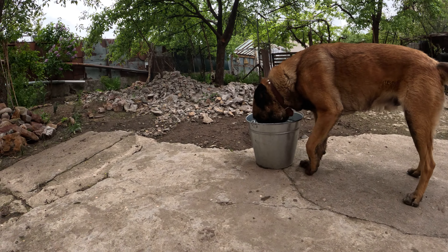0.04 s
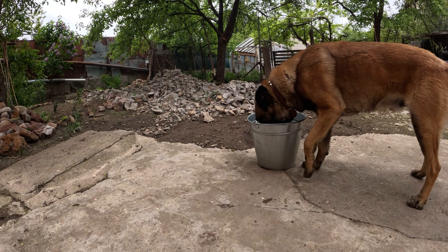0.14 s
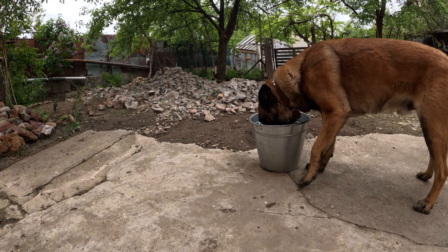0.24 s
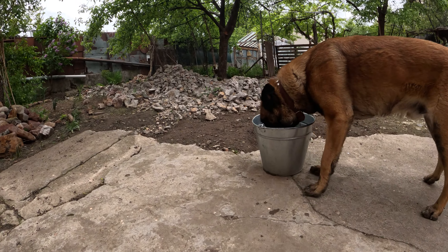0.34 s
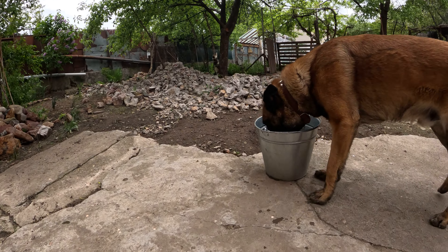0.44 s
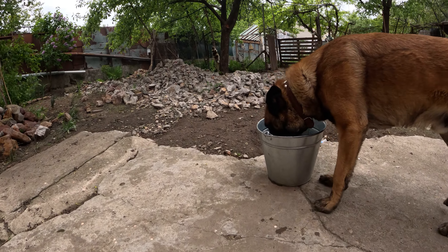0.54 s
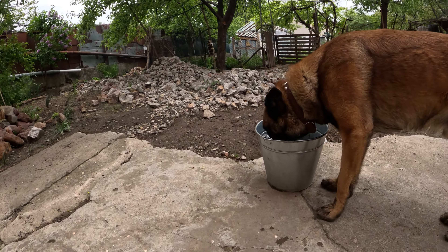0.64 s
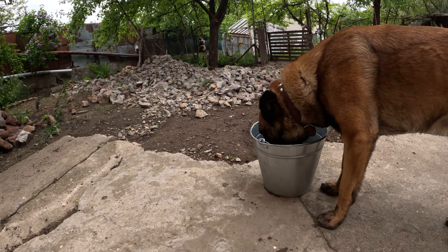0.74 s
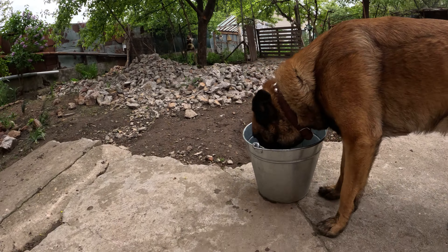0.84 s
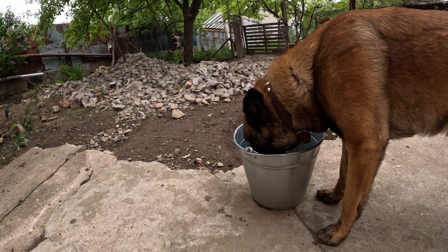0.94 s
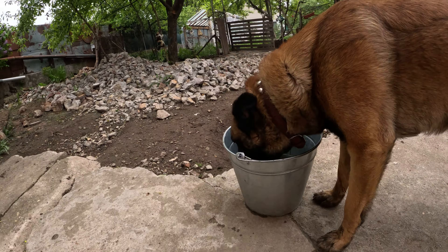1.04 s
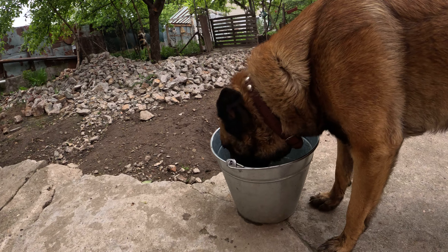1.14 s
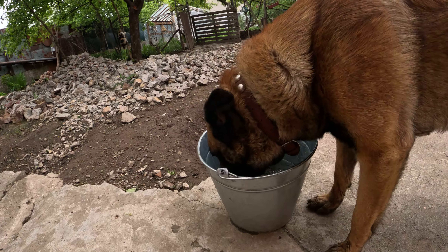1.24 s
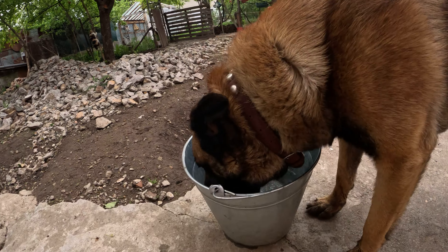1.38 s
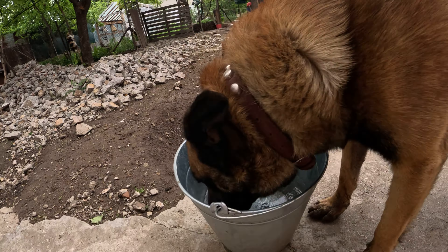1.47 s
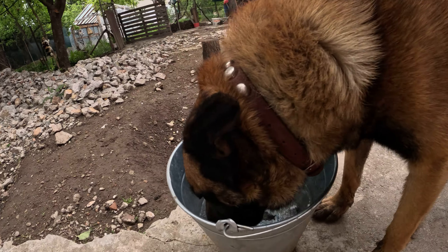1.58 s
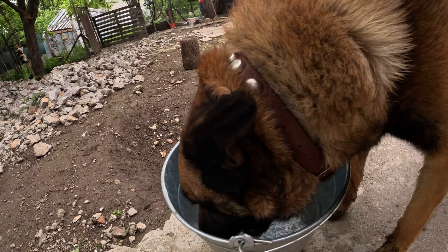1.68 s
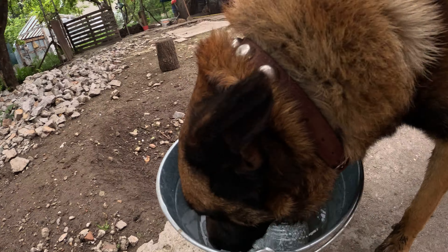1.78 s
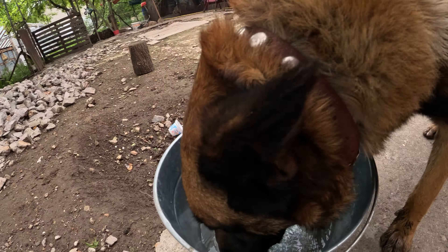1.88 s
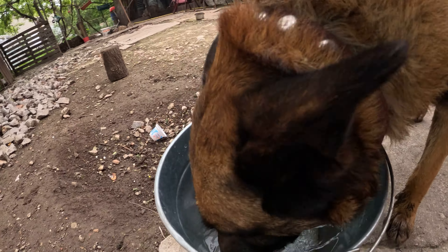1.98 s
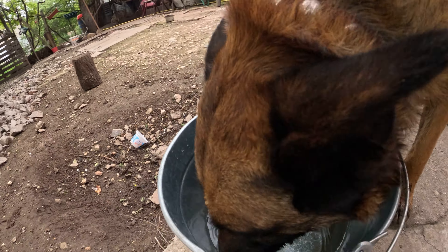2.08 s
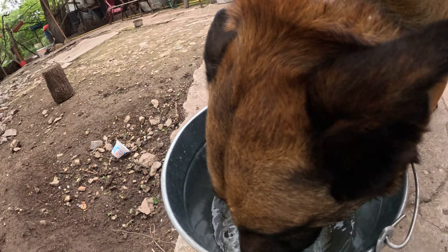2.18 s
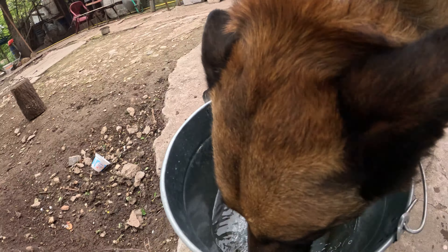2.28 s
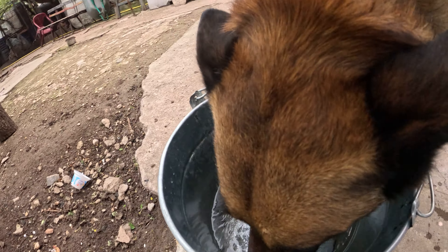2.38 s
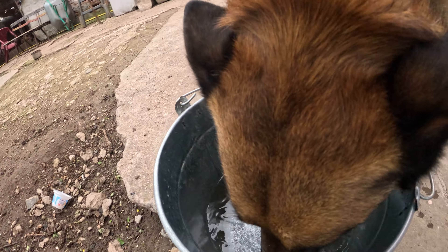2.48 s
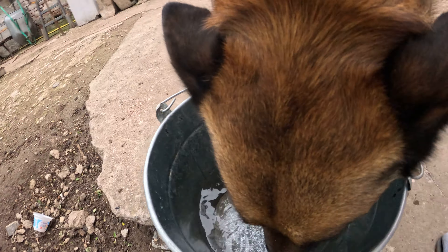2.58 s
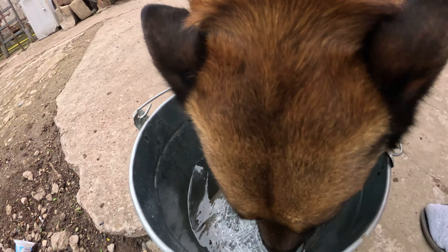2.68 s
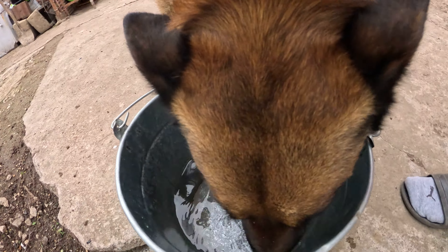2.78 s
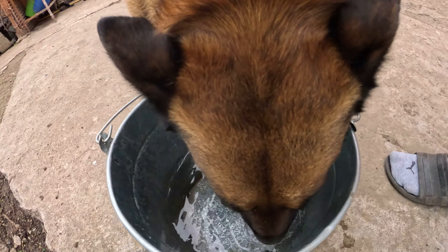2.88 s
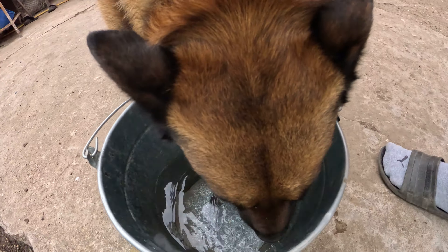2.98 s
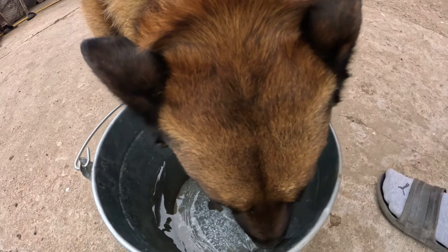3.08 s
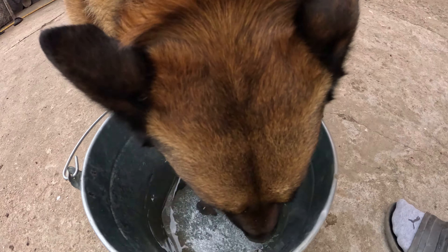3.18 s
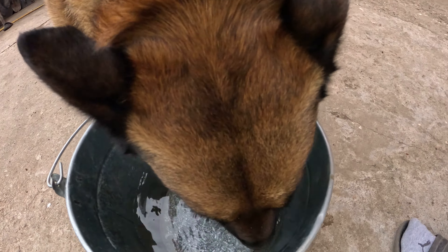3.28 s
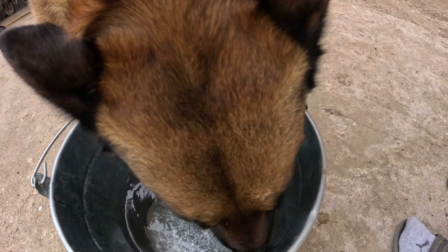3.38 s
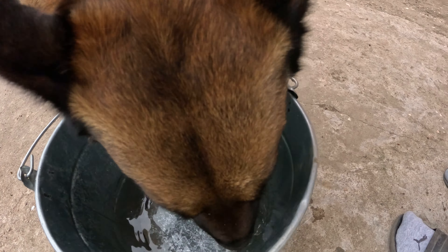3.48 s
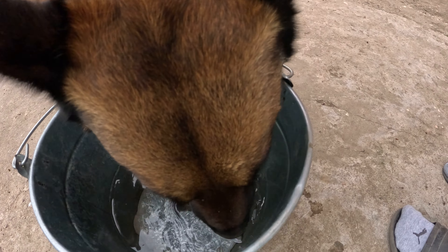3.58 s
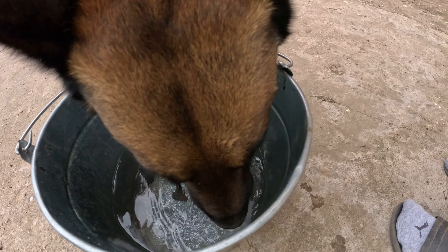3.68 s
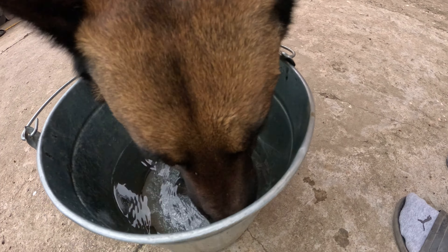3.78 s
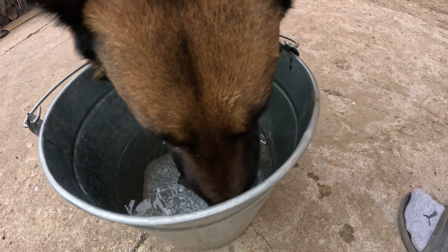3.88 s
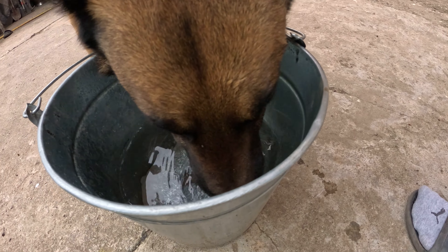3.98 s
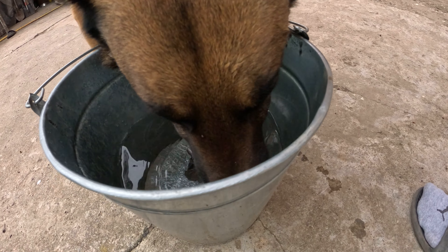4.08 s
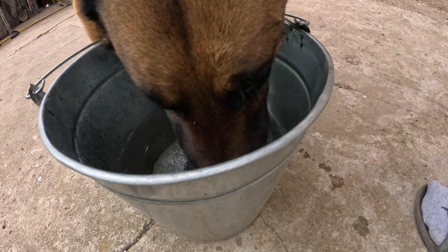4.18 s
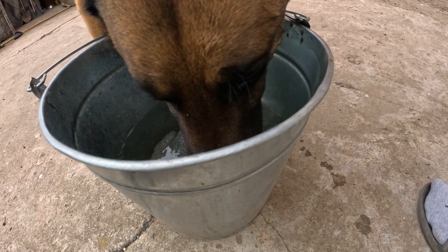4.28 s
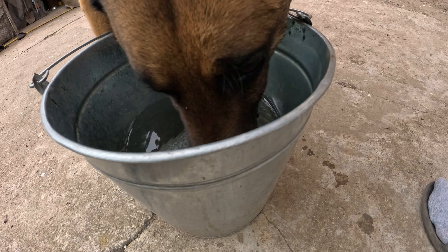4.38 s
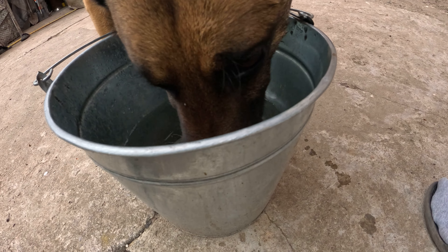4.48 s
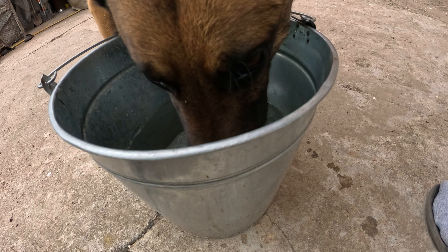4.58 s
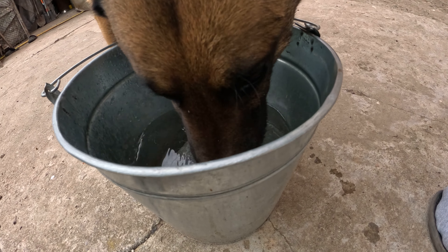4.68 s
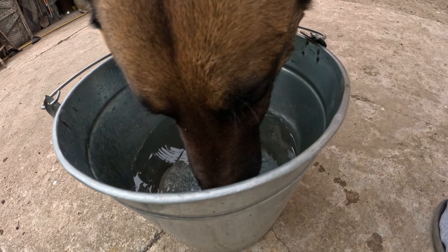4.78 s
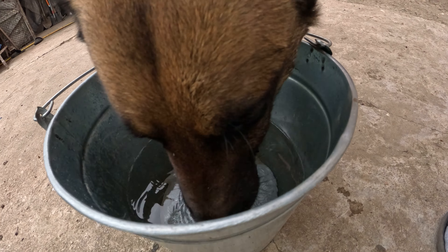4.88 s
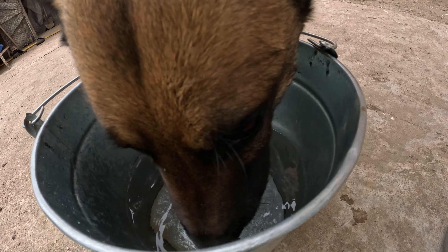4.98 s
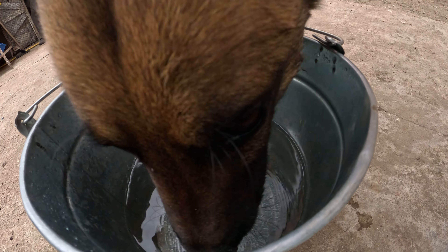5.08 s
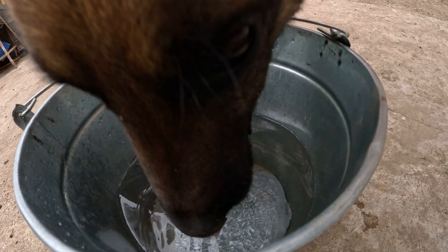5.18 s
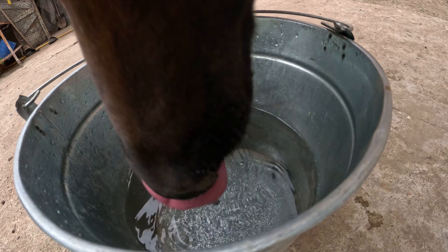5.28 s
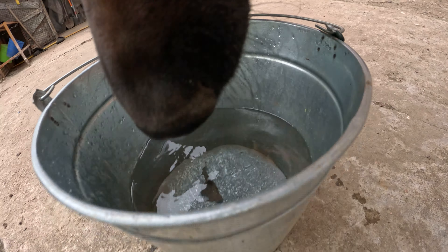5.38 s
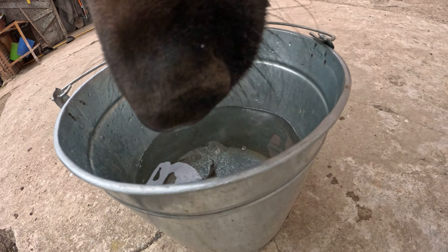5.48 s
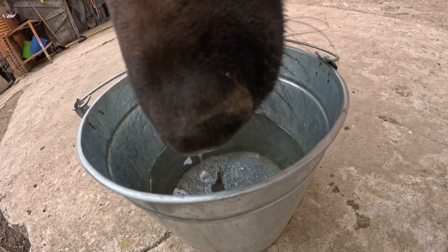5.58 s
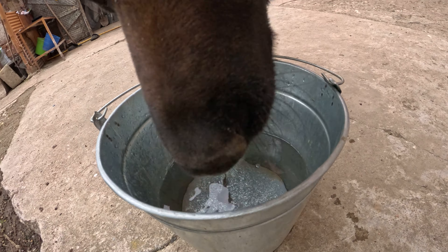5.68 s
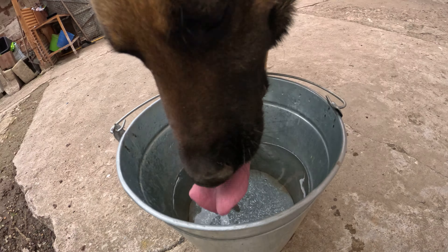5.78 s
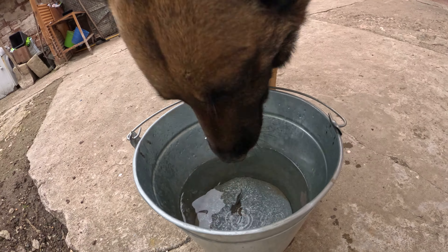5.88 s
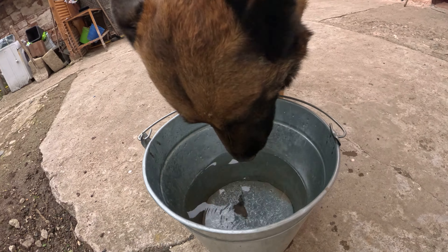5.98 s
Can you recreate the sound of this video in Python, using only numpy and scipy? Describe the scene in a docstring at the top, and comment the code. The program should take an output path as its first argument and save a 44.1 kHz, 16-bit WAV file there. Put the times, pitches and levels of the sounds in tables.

```python
"""A dog laps water from a metal bucket in a yard, nearly three laps a second.
In each lap the tongue smacks the water, air pockets plop and water dribbles back: decaying bubble tones,
droplet clouds and filtered crackle, coloured by the resonances and short reflections of the bucket.
Someone carrying the microphone walks up over gritty concrete (scuffs and cracks of shaped noise),
with soft bumps of damped sines, a low-noise rumble of moving air and faint steady noise of the yard."""
import sys
import numpy as np
from scipy import signal
from scipy.fft import rfft, irfft, next_fast_len
from scipy.io import wavfile

SR = 44100
rng = np.random.default_rng(int(sys.argv[2]) if len(sys.argv) > 2 else 0)


def generate_wav(signal):
    """Clip the signal to [-1, 1] and save it as 16-bit WAV at the path in sys.argv[1]."""
    frames = np.transpose(np.atleast_2d(signal))
    scaled = np.clip(frames, -1, 1) * 32767
    pcm = np.round(scaled).astype(np.int16)
    wavfile.write(sys.argv[1], SR, pcm)


N = 266364
TIME = np.arange(N) / SR
AGE = np.arange(4096) / SR  # time since the start of a short event [s]


def from_db(db):
    """Level: amplitude is ten to the power of dB / 20."""
    return 10 ** (np.asarray(db) / 20)


def rms_one(x):
    """Normalisation: scale to unit root-mean-square amplitude."""
    return x / np.sqrt(np.mean(x ** 2) + 1e-20)


def gain_curve(rows):
    """Envelope: interpolate levels (time [s], level [dB]) and return a gain."""
    times, levels_db = np.transpose(rows)
    return from_db(np.interp(TIME, times, levels_db))


def add(track, start_s, sound):
    """Superposition: mix a sound into the track at its start time."""
    part = track[max(round(start_s * SR), 0):][:len(sound)]
    part += sound[:len(part)]


def band(x, low_hz, high_hz, order=2):
    """Band-pass filtering: keep the energy between two frequencies."""
    sos = signal.butter(order, [low_hz, high_hz], "band", fs=SR, output="sos")
    return signal.sosfilt(sos, x + 1e-18)


def coloured(x, spectrum):
    """Spectral shaping: weight by levels interpolated over log frequency, silent outside them; rms 1."""
    hz, levels_db = np.transpose(spectrum)
    size = next_fast_len(N)
    log_hz = np.log(np.maximum(np.fft.rfftfreq(size, 1 / SR), 1))
    weights_db = np.interp(log_hz, np.log(hz), levels_db, left=-np.inf, right=-np.inf)
    return rms_one(irfft(rfft(x, size) * from_db(weights_db), size)[:N])


def drift(per_s):
    """Slow random modulation: straight lines between random knots; rms 1."""
    knots = rng.standard_normal(4096)
    return rms_one(np.interp(TIME * per_s, np.arange(len(knots)), knots))


def grains(per_s, spread_db, size):
    """Shot noise: clicks at random moments, a few much larger than the rest; rms 1."""
    heights = from_db(spread_db * np.minimum(rng.exponential(1, size), 4))
    heights = heights * rng.choice([-1, 1], size)
    return rms_one(heights * (rng.random(size) < per_s / SR))


def strokes(rows, attack_s, swell_db, release_s):
    """Envelope: each row fades in, moves by swell_db to its level at the end and dies away."""
    out = np.zeros(N)
    for start, length, db in rows:
        end = start + length
        fade_in = np.minimum(TIME - start, 0) / attack_s
        fade_out = np.maximum(TIME - end, 0) / release_s
        remaining = np.clip((end - TIME) / length, 0, 1)
        out += np.exp(fade_in - fade_out) * from_db(db - swell_db * remaining)
    return out


def bubble(hz, t60, glide, swell_s, glide_s=0.0099, size=4096):
    """Bubble oscillation: an air pocket rings with 60 dB decay in t60 [s] and glides [octaves]; envelope peak 1."""
    age = AGE[:size]
    pitch = hz * 2 ** (glide * (1 - np.exp(-age / glide_s)))
    shape = (1 - np.exp(-age / swell_s)) ** 2 * from_db(-60 * age / t60)
    shape = shape / shape.max(axis=-1, keepdims=True)
    return shape * np.sin(2 * np.pi * np.cumsum(pitch, axis=-1) / SR)


def droplets(centre_hz, octaves, spread_s, count):
    """Bubble cloud: pockets of staggered sizes, mostly rising, burst close together; rms 1 over AGE."""
    sizes = (np.arange(count)[:, None] + rng.random((count, 1))) / count
    hz = centre_hz * 2 ** (octaves * (1.8 * sizes - .8))
    rise = .6 * rng.random((count, 1)) - .2
    rings = bubble(hz, t60=.009 * (1500 / hz) ** .45, glide=rise, swell_s=.7 / hz, size=1024)
    delays = rng.gamma(2, spread_s, count) + rng.uniform(0, spread_s, count)
    cloud = np.zeros(len(AGE))
    for ring, delay in zip(rings, delays):
        add(cloud, delay, ring * from_db(4 * rng.standard_normal()) * rng.choice([-1, 1]))
    return rms_one(cloud)


def drops(low_hz, octaves, t60, spread_db, tilt_db, count):
    """Random superposition: drops ring briefly (t60 at 1500 Hz), the smallest weaker by tilt_db; rms 1."""
    out = np.zeros(N)
    for when, smallness, strength, rise in rng.random((count, 4)):
        hz = low_hz * 2 ** (octaves * smallness)
        ring = bubble(hz, t60 * np.sqrt(1500 / hz), glide=.6 * rise - .1, swell_s=1 / hz, size=640)
        level_db = spread_db * strength ** 2 - tilt_db * smallness ** 2
        add(out, when * N / SR, from_db(level_db) * ring)
    return rms_one(out)


# resonances of the air in the bucket: (frequency [Hz], bandwidth [Hz], gain [dB])
BUCKET_MODES = [(389.8, 84, 26), (876, 73, 13), (1256, 300, 1.5), (1562, 63, 11), (2620, 810, 7),
                (3400, 800, 2)]


def bucket_air(x, direct_db, shift=0):
    """Modal resonance: sound sets the air in the bucket ringing; shift [octaves] retunes every mode."""
    out = from_db(direct_db) * x
    for hz, width, db in BUCKET_MODES:
        radius = np.exp(-np.pi * width / SR)
        angle = 2 * np.pi * hz * 2 ** shift / SR
        zeros = np.array([1, 0, -1]) * (1 - radius ** 2) / 2
        poles = [1, -2 * radius * np.cos(angle), radius ** 2]
        out = out + from_db(db) * signal.lfilter(zeros, poles, x + 1e-18)
    return out


def echoes(x, t60, level_db, delay_s):
    """Reverberation: convolve with exponentially decaying noise, a dense tail of reflections."""
    age = TIME[:SR // 2]
    tail = rng.standard_normal(len(age)) * from_db(-60 * age / t60) * (age > delay_s)
    return from_db(level_db) * signal.fftconvolve(x, tail / np.linalg.norm(tail))[:N]


# wet smacks of tongue and lips, each a small bubble in a spatter of droplets:
# (time [s], bubble peak level [dB], starting pitch [Hz], glide [octaves], relative spatter level [dB])
TONGUE_SMACKS = [(0.337, -46.5, 1280, -0.2, -62), (0.6492, -41, 1200, 0.36, -44.5),
                 (0.7, -39, 1490, 0.26, -47.5), (1.263, -36, 910, -0.65, -45),
                 (1.432, -41, 1000, -0.6, -46.5), (1.4676, -31.5, 800, -0.18, -46.5),
                 (1.479, -37, 3200, 0.95, -52), (1.552, -39.5, 684, 0.4, -45.5),
                 (1.6212, -34, 793, 0.48, -46), (1.73, -20, 1424, -0.56, -46),
                 (1.931, -39, 2820, 0.38, -40.5), (2.223, -32.5, 960, -0.81, -53),
                 (2.233, -20, 834, -0.16, -43.5), (2.233, -32.5, 2930, -0.025, -53),
                 (2.259, -34.5, 560, -0.13, -44.5), (2.2866, -41.5, 3450, 0.069, -59),
                 (2.3259, -32, 2294, 0.59, -43), (2.384, -41.5, 4680, -0.94, -74),
                 (2.4338, -32, 1545, 0.067, -40), (2.486, -32, 954, -0.62, -42.5),
                 (2.551, -30, 1480, -0.16, -40), (2.566, -40, 2300, 1.1, -60), (2.608, -41, 1410, 1.1, -51),
                 (2.632, -36, 1194, 0.55, -43), (2.826, -28, 4700, -0.53, -40),
                 (2.958, -23.5, 2930, -0.22, -35.5), (3.0243, -28.5, 2920, -0.089, -37.5),
                 (3.128, -38, 1260, -0.14, -46.5), (3.148, -46, 1090, 0.54, -38.5),
                 (3.1887, -33, 1050, 0.54, -42.5), (3.254, -34, 970, 0.45, -35.5),
                 (3.3131, -27, 3230, -0.89, -45), (3.341, -44, 1610, -0.25, -36),
                 (3.445, -36, 1220, -0.14, -39), (3.502, -24.5, 1305, 0.83, -42),
                 (3.5506, -27, 2700, -0.35, -47), (3.6557, -38, 1076, 1.06, -45.5),
                 (3.8477, -42.5, 1190, 0.28, -44.5), (3.8985, -25, 985, -0.32, -40),
                 (3.9108, -33.5, 2550, -0.098, -44), (3.9755, -27.5, 2920, -0.44, -42),
                 (4.0489, -35, 1240, -0.093, -40), (4.169, -36.5, 4020, 0.098, -49.5),
                 (4.2269, -37.5, 1960, 0.074, -44.5), (4.297, -28.5, 1500, -0.2, -53),
                 (4.353, -24.5, 4050, -0.35, -63), (4.369, -35, 1410, -0.1, -51),
                 (4.3815, -30.5, 3580, 0.34, -60), (4.562, -31, 1450, 0.032, -46),
                 (4.612, -38, 2820, 0.23, -46), (5.0085, -21.5, 2120, -0.79, -36.5),
                 (5.026, -28.5, 1370, 0.89, -36), (5.0466, -36, 3800, 0.11, -43),
                 (5.077, -30.5, 4910, 0.062, -61), (5.088, -37, 4460, -0.68, -45.5),
                 (5.145, -40, 2400, -0.34, -55), (5.174, -41.5, 3400, 0.55, -48),
                 (5.19, -39, 1290, 0.74, -67), (5.482, -42.5, 2600, 0.18, -52.5),
                 (5.505, -39, 1770, 0.77, -48.5)]
# fine spray, highest while the microphone is right over the bucket: (time [s], relative level [dB])
SPRAY_LEVEL = [(0.6, -14), (1.5, -2), (2.5, -6), (4.3, -0.5), (5.1, -8)]
BUBBLE_SWELL_S, BUBBLE_T60_S = 0.0008, 0.013  # decay at 1500 Hz without an upward glide
ONSET_DB = -16  # against the bubble's peak
MUZZLE_SHIFT_OCTAVES = .07  # the moving muzzle retunes the air in the bucket from smack to smack


def smacks():
    """Bubble oscillation: each smack swells in softly at its own pitch, then chirps amid droplets and fizz.

    Small bubbles die sooner; those that glide far upward ring longer.
    """
    out = np.zeros(N)
    swell = AGE / 0.0037
    fizz_shape = rms_one(swell ** 2 * np.exp(-swell))
    for s, db, hz, glide, spatter_db in TONGUE_SMACKS:
        t60 = BUBBLE_T60_S * (1500 / hz) ** .45 * (1 + 1.6 * max(glide, 0))
        add(out, s - .0005, from_db(db) * bubble(hz, t60, glide, BUBBLE_SWELL_S))
        # a reversed ring gives a soft onset
        onset_t60 = 170 / hz * min(hz / 4500, 1) ** 2
        onset = bubble(hz, onset_t60, glide=0, swell_s=BUBBLE_SWELL_S)[::-1]
        add(out, s - AGE[-1], from_db(db + ONSET_DB) * onset)
        spray_db = spatter_db + np.interp(s, *np.transpose(SPRAY_LEVEL))
        coarse = from_db(spatter_db - 18.0) * droplets(1353, octaves=0.91, spread_s=.0025, count=12)
        fine = from_db(spray_db - 17.5) * droplets(3236, octaves=0.87, spread_s=.0034, count=22)
        fizz_grains = fizz_shape * grains(2200, spread_db=3, size=len(AGE))
        fizz = from_db(spray_db - 22) * rms_one(band(fizz_grains, 3400, 9000))
        shift = MUZZLE_SHIFT_OCTAVES * rng.standard_normal()
        add(out, s - .0058, bucket_air(coarse + fine + fizz, direct_db=-6.5, shift=shift))
    return out


# large air pockets closing under the tongue: (time [s], peak level [dB], nominal pitch [Hz])
AIR_POCKETS = [(0.586, -31.5, 286), (0.8845, -28.5, 304), (1.264, -36, 254), (1.5644, -29, 271),
               (1.867, -28, 308), (1.933, -36.5, 376), (2.102, -37, 353), (2.2464, -29.5, 415),
               (2.249, -33, 274), (2.2841, -34, 336), (2.5475, -26.5, 450), (2.5588, -19, 309),
               (2.724, -34, 350), (2.8411, -33.5, 387), (2.9702, -28.5, 308), (2.98, -30, 480),
               (3.0224, -27, 550), (3.1874, -31.5, 452), (3.272, -27, 416), (3.585, -16, 358),
               (3.8988, -27.5, 394), (3.91, -33.5, 533), (3.9759, -33.5, 380), (3.9996, -28, 378),
               (4.0469, -36, 450), (4.3121, -31.5, 442), (4.6433, -19, 349), (5.0143, -26, 256),
               (5.0997, -16.5, 342), (5.142, -51, 360)]
PLOP_T60_S = 0.0145  # at 360 Hz and above; deeper plops die sooner
SUCK_LEAD_S, SUCK_DB = 0.01132, -18.5  # the tongue pulls the hollow open just before it closes
SHOVE_DB, SHOVE_DB_PER_OCTAVE = -9, 28  # under a plop of 360 Hz; deeper plops shove more water
SPLIT_DB, SLAP_DB = -31, -38.5  # split-off pockets and splash before the bucket: rms against plop peak


def plops():
    """Cavity collapse: a hollow opens softly and closes with a low damped note, a shove of water and a slap.

    Each note rises by its own amount and is roughened by smaller pockets that split off.
    """
    notes, slaps = np.zeros((2, N))
    for (s, db, hz), rise in zip(AIR_POCKETS, rng.random(len(AIR_POCKETS))):
        t60 = PLOP_T60_S * min(hz / 360, 1) ** 0.49
        opening = bubble(hz, t60=0.01, glide=0.099, swell_s=0.0047)
        add(notes, s - SUCK_LEAD_S, from_db(db + SUCK_DB) * opening)
        closing = bubble(hz * 0.89, t60, glide=0.1 + 0.5 * rise, swell_s=1.56 / hz)
        add(notes, s, from_db(db) * closing)
        split = droplets(hz, octaves=0.79, spread_s=.004, count=7)
        add(notes, s, from_db(db + SPLIT_DB) * split)
        shove_db = db + SHOVE_DB + SHOVE_DB_PER_OCTAVE * np.log2(360 / hz)
        add(notes, s, from_db(shove_db) * bubble(195, t60=0.054, glide=0, swell_s=0.00073))
        splash = droplets(746, octaves=1.0, spread_s=0.0039, count=12)
        add(slaps, s - .004, from_db(db + SLAP_DB) * splash)
    ringing = from_db(-23) * bucket_air(notes, direct_db=-13)
    return notes + bucket_air(slaps, direct_db=-7.5) + ringing


# laps, each stirring the water around the muzzle: (start [s], length [s], relative level [dB])
LAP_STROKES = [(0.29, 0.056, -56), (0.58, 0.15, -51), (0.88, 0.086, -53.5), (1.23, 0.13, -50.5),
               (1.43, 0.19, -51.5), (1.79, 0.15, -47.5), (2.09, 0.2, -47.5), (2.45, 0.15, -49.5),
               (2.83, 0.18, -50), (3.16, 0.25, -48), (3.48, 0.11, -46), (3.87, 0.16, -48),
               (4.21, 0.16, -45), (4.56, 0.17, -51.5), (5.01, 0.21, -50), (5.47, 0.143, -48)]
LAP_ATTACK_S, LAP_RELEASE_S = 0.024, 0.013
LAP_SWELL_DB = 19  # the dribble grows as the tongue draws water up
SETTLE_DB, SETTLE_S = -16, 0.42  # after each lap the water goes on dripping and settles slowly


def dribble():
    """Bubble entrainment: falling drops leave bubbles of every size over a fine crackle and a dull slosh."""
    bubbles = drops(700, octaves=2.7, t60=.012, spread_db=16, tilt_db=7, count=5500)
    crackle = rms_one(band(grains(1200, spread_db=5.0, size=N), 170, 7400))
    crackle = rms_one(bucket_air(crackle, direct_db=-8.5))
    slosh = rms_one(band(rng.standard_normal(N), 117, 375, order=3))
    # the negative swell makes the settling fall during the lap
    settling = strokes(LAP_STROKES, attack_s=0.039, swell_db=-7.0, release_s=SETTLE_S)
    flow = strokes(LAP_STROKES, LAP_ATTACK_S, LAP_SWELL_DB, LAP_RELEASE_S)
    flow = flow + from_db(SETTLE_DB) * settling
    # stirred water traps many bubbles, calm water mostly rustles
    trapping = (flow / flow.max()) ** .35
    water = from_db(-2) * trapping * bubbles + from_db(-9) * crackle + from_db(-4.0) * slosh
    spurts = from_db(2 * drift(70))
    return flow * water * spurts


def patter():
    """Impact entrainment: flung droplets land on the water as a scatter of small bright blips."""
    flung = strokes(LAP_STROKES, attack_s=0.023, swell_db=7.5, release_s=0.045)
    hits = drops(2400, octaves=2, t60=.009, spread_db=16, tilt_db=10, count=4500)
    return from_db(-4) * gain_curve(SPRAY_LEVEL) * flung * hits


# drops falling from the muzzle, each leaving one bubble: (time [s], peak level [dB], nominal pitch [Hz])
MUZZLE_DRIPS = [(1.225, -45, 3480), (1.272, -41, 2700), (1.333, -36.5, 920), (1.62, -39.5, 3300),
                (1.639, -37, 3200), (1.948, -40, 4870), (2.09, -40, 2760), (2.448, -38, 2040),
                (2.529, -50, 4750), (2.639, -43, 4650), (2.641, -35, 2800), (2.932, -45, 2410),
                (3.035, -32.5, 2760), (3.236, -38, 5900), (3.447, -36, 4350), (3.528, -31, 2180),
                (3.64, -35, 3820), (3.977, -31.5, 3430), (4.057, -30, 2180), (4.295, -38.5, 5370),
                (4.383, -36, 1590), (4.563, -41, 3900), (4.578, -35, 1770), (4.656, -40, 2900),
                (4.714, -36, 3620), (5.009, -39, 3980), (5.036, -43, 5980), (5.194, -42.5, 3970)]


def drips():
    """Bubble resonance: single drops land; each bubble swells softly and rises a little as it rings."""
    out = np.zeros(N)
    for (s, db, hz), rise in zip(MUZZLE_DRIPS, rng.uniform(0, .3, len(MUZZLE_DRIPS))):
        ring = bubble(hz * 2 ** (-rise / 4), t60=.011, glide=rise, swell_s=.0008)
        add(out, s - .001, from_db(db) * ring)
    return out


def bucket():
    """Multiple reflection: the metal wall throws the lapping and the plops back and forth."""
    lapping = smacks() + drips() + dribble() + patter()
    hollow = plops()
    lapping_echo = echoes(lapping, t60=0.052, level_db=-6.5, delay_s=0.0013)
    hollow_echo = echoes(hollow, t60=0.31, level_db=-12.0, delay_s=0.0069)
    return lapping + hollow + lapping_echo + hollow_echo


# soles scuffing on concrete: (start [s], length [s], relative level [dB])
SOLE_SCUFFS = [(0.65, 0.21, -73.5), (1.355, 0.027, -69), (1.44, 0.042, -67), (2.14, 0.057, -66.5),
               (2.7, 0.035, -68), (2.88, 0.18, -59.5), (3.32, 0.021, -51), (3.405, 0.025, -48.5),
               (5.655, 0.054, -60.5), (5.76, 0.048, -70.5)]
# colour of the scuffs: (frequency [Hz], relative level [dB])
SCUFF_SPECTRUM = [(290, -51), (500, -17), (1150, -1), (1250, 7.5), (1430, 2), (3430, 1), (8720, -12),
                  (15500, -30)]


def footsteps():
    """Granular friction: soles grind sand over concrete, as dense clicks of unsteady level."""
    unevenness = from_db(2.2 * drift(140) + 2 * drift(35))
    sand = grains(3000, spread_db=4, size=N) * unevenness
    # the small swell is weight settling on the sole
    pressure = strokes(SOLE_SCUFFS, attack_s=0.031, swell_db=0.5, release_s=0.018)
    return from_db(13.5) * coloured(sand, SCUFF_SPECTRUM) * pressure


# single larger grains of grit cracking: (time [s], relative peak level [dB])
GRIT_CRACKS = [(0.8335, -14.5), (1.2643, -15), (1.4645, -9), (2.385, -21), (2.544, -13), (2.883, -15),
               (3.313, -20), (3.406, -24), (3.414, -12), (3.5715, -7), (4.111, -12), (4.489, -19),
               (4.75, -17)]


def grit():
    """Impulsive fracture: a larger grain cracks as a click with a short tail of crumbling noise."""
    cracks = np.zeros(N)
    for s, db in GRIT_CRACKS:
        crumbs = from_db(-11) * rng.standard_normal(len(AGE)) * from_db(-60 * AGE / 0.009)
        add(cracks, s, from_db(db) * (signal.unit_impulse(len(AGE)) + crumbs))
    return from_db(-10.5) * band(cracks, 1200, 6370)


# soft bumps of walking and handling: (time [s], level [dB], pitch [Hz])
HANDLING_BUMPS = [(0.442, -22.5, 54), (0.527, -26, 165), (0.61, -24, 151), (0.642, -21.5, 123),
                  (0.796, -24, 76.6), (0.841, -21, 80), (1.039, -20, 67.3), (1.041, -32, 171),
                  (3.657, -19, 48), (5.009, -21.5, 190), (5.061, -18.5, 150), (5.405, -25, 58.4),
                  (5.526, -24.5, 102)]


def bumps():
    """Damped oscillation: each bump shakes the microphone for a few cycles, losing 10 dB per cycle."""
    out = np.zeros(N)
    for s, db, hz in HANDLING_BUMPS:
        cycles = hz * AGE
        shape = (1 - np.exp(-cycles / 0.099)) ** 2 * from_db(-10 * cycles)
        add(out, s, from_db(db) * shape / shape.max() * np.sin(2 * np.pi * cycles))
    return out


# air buffeting the microphone: (time [s], relative level [dB])
AIR_BUFFET = [(0.0, -37), (0.3, -50.5), (0.42, -39), (0.64, -31), (0.72, -34.5), (1.36, -44), (2.09, -43.5),
              (2.61, -49.5), (3.33, -46), (3.62, -41), (4.1, -46), (4.91, -38.5), (5.23, -47),
              (5.63, -39.5), (6.04, -49)]
# colour of the moving air: (frequency [Hz], relative level [dB])
AIR_SPECTRUM = [(12, -66), (20, 8.5), (43, 2.5), (145, -6.5), (229, -12), (276, -51), (372, -25.5),
                (500, -53), (650, -56), (1100, -120)]


def rumble():
    """Turbulent pressure: lumpy low noise of air on the microphone, knocking when it is strong."""
    buffet = gain_curve(AIR_BUFFET)
    lumpy_noise = rng.standard_normal(N) * from_db(2.2 * drift(18))
    air = from_db(3.5) * buffet * coloured(lumpy_noise, AIR_SPECTRUM)
    knocks = rms_one(band(grains(200, spread_db=3.5, size=N), 130, 310, order=3))
    return air + from_db(-9.5) * buffet ** 2 / buffet.max() * knocks


# colour of the yard: (frequency [Hz], relative level [dB])
YARD_SPECTRUM = [(150, -31), (250, -6.5), (496, -21.5), (1210, -28), (2060, -29), (8670, -43),
                 (15000, -72.5)]


def yard():
    """Stationary noise: a faint steady background with a fixed spectrum."""
    return from_db(-58.5) * coloured(rng.standard_normal(N), YARD_SPECTRUM)


def scene():
    """Superposition: the bucket and the steps with their echoes, in the open air of the yard."""
    near = bucket() + footsteps() + grit()
    near_echo = echoes(near, t60=1.0, level_db=-24.5, delay_s=0.0057)
    return (near + near_echo + bumps() + rumble() + yard())[None]


def record(dry):
    """Low-pass filtering: an elliptic filter cuts the top steeply above 15750 Hz."""
    sos = signal.ellip(10, .1, 80, 15750, fs=SR, output="sos")
    return signal.sosfilt(sos, dry)


dry = scene()
out = record(dry)
generate_wav(out)
```